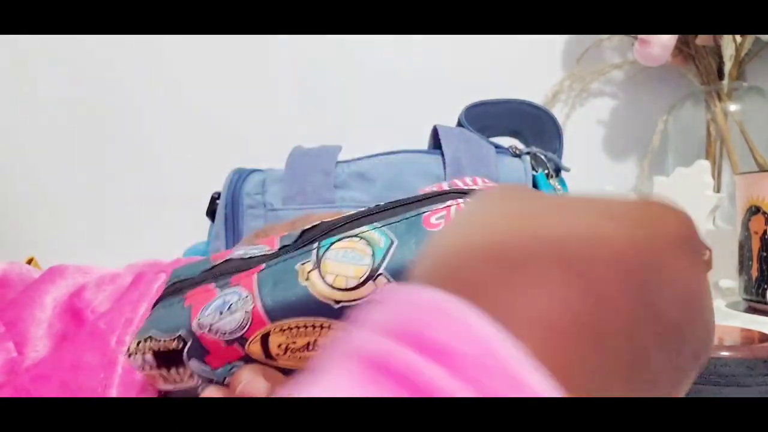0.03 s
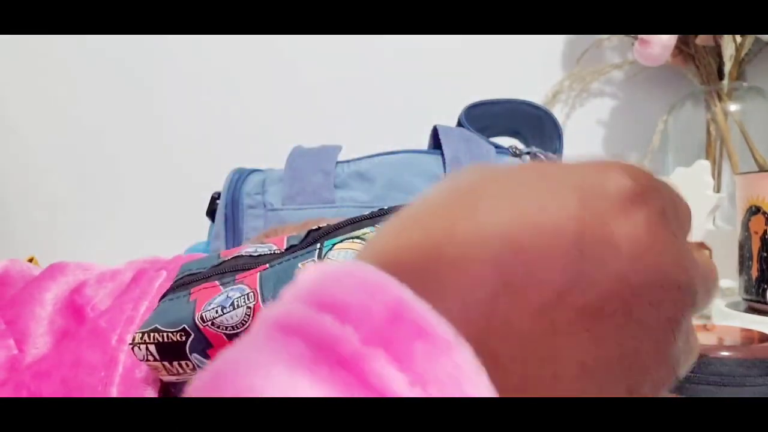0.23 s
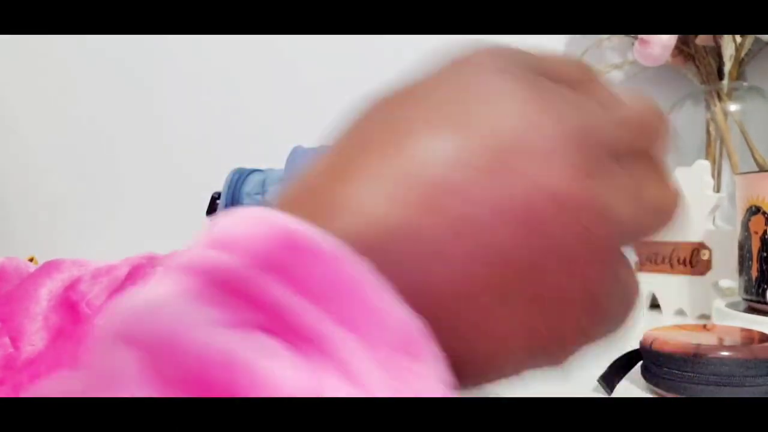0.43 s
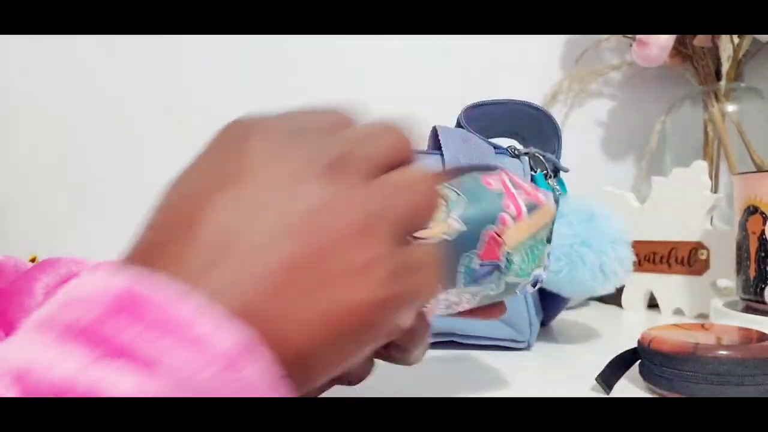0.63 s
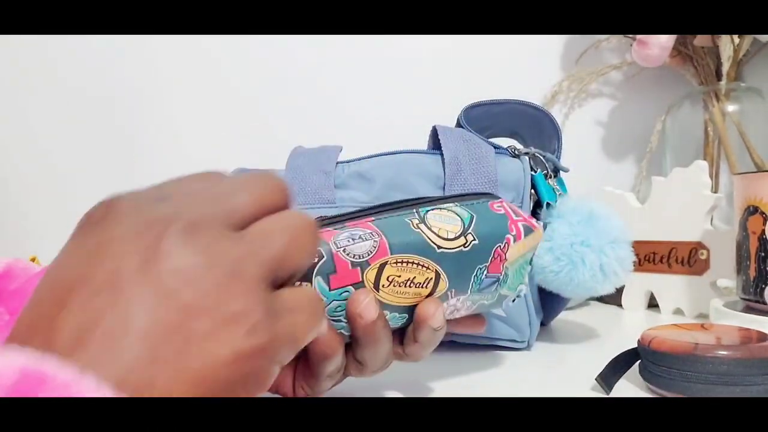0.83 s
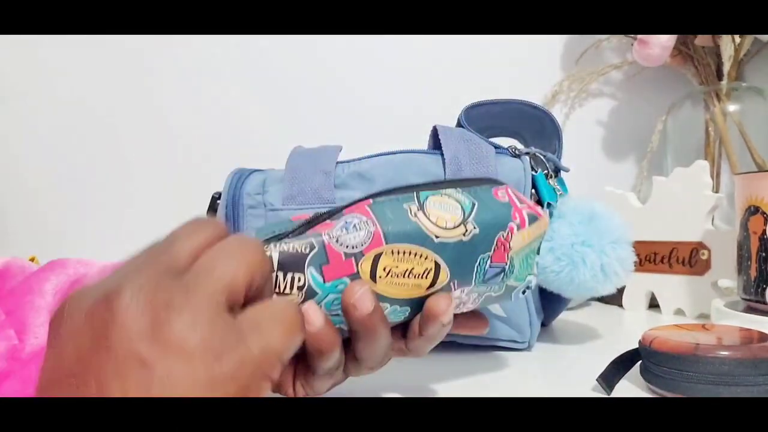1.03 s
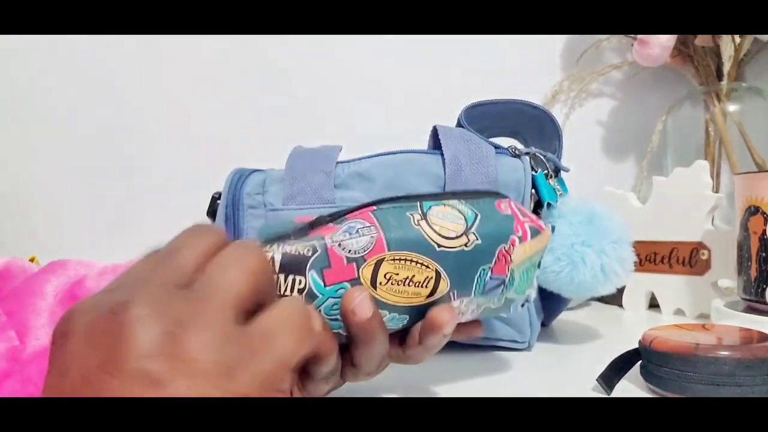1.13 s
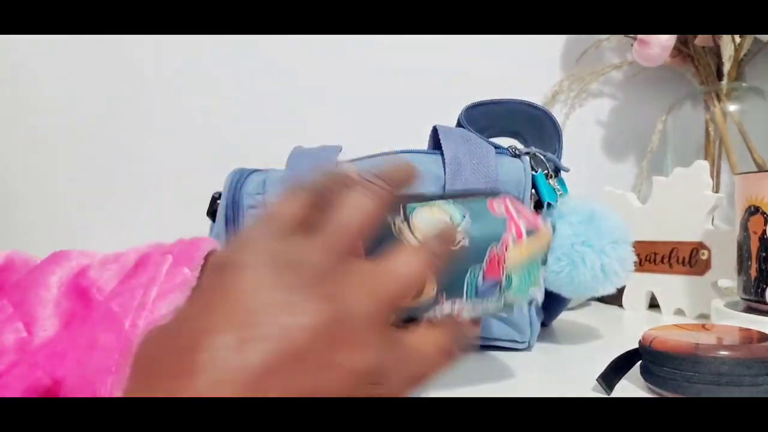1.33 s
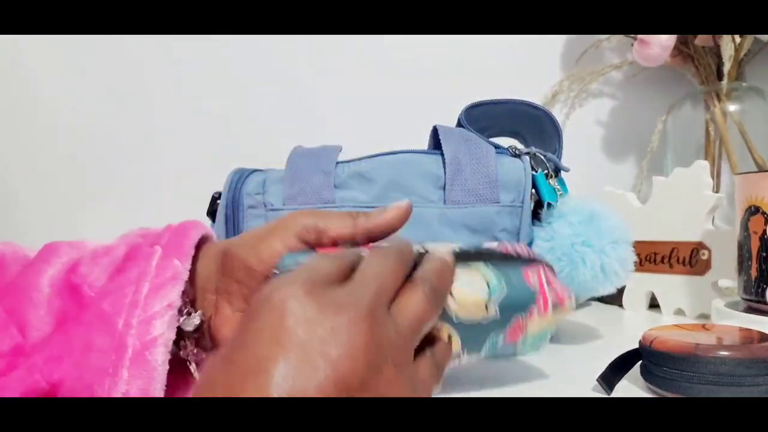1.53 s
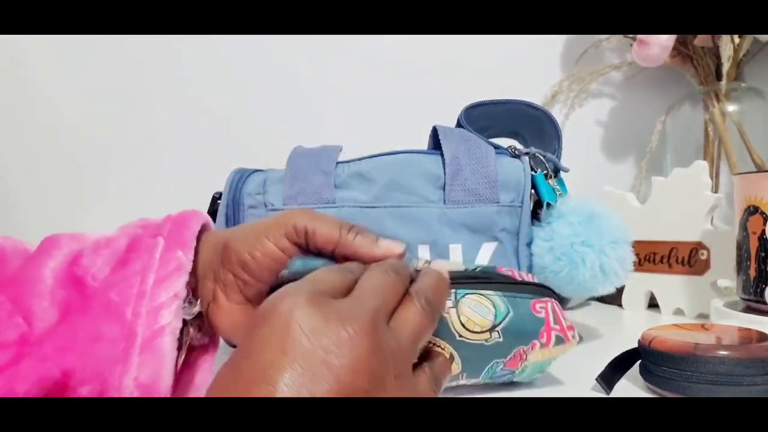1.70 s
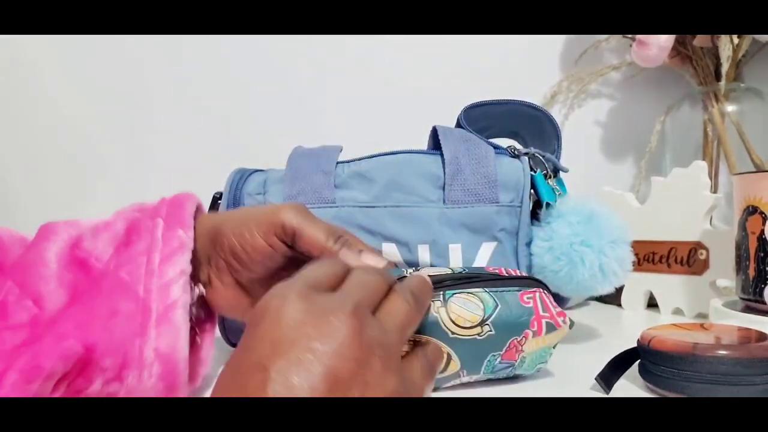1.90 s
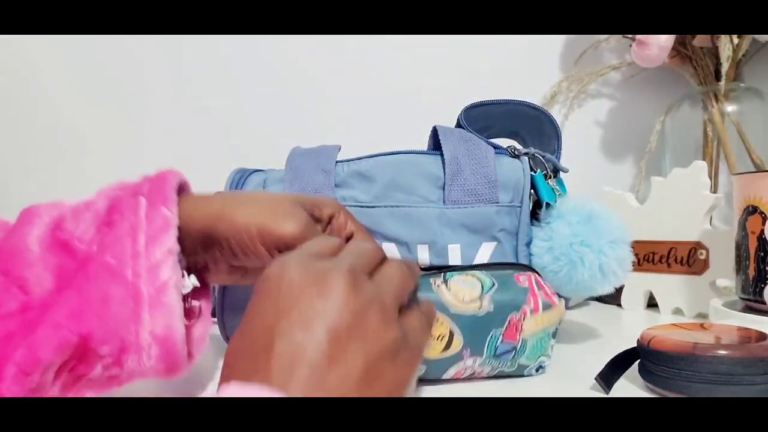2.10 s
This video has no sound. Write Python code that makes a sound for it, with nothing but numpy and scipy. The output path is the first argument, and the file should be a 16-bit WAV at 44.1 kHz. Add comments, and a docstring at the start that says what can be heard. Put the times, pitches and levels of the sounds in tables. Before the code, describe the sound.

A small pouch zipper opens close by: a short rasping tug, a brief lull, then a fast singing zip that slows into separate tooth clicks, followed by cloth rustle and crease snaps in a quiet room.

```python
"""A zipper on a small fabric pouch is pulled open nearby in a quiet room: tug, fast run, single teeth, slow end.
Each tooth knocks the slider, which scrapes and rings; the fast run also sings at the tooth rate.
Cloth rustles as hands turn and spread the pouch: noise with crackles, over a low rumble.
Creases and the pull tab snap (click, ring, noise); low decaying sines thump through the table.
Faint room tone lies beneath; a changing stereo side and a short room tail surround it all."""
import sys
import numpy as np
from scipy import signal
from scipy.io import wavfile
from scipy.ndimage import uniform_filter1d

SR = 44100
rng = np.random.default_rng(int(sys.argv[2]) if len(sys.argv) > 2 else 0)


def put_to_file(sound):
    """Save the sound as 16-bit audio at rate SR, in the file named by the first command-line argument."""
    columns = np.atleast_2d(sound).T  # one column per channel
    safe = np.clip(columns, -1, 1)
    whole_steps = np.round(safe * 32767)
    wavfile.write(sys.argv[1], SR, whole_steps.astype(np.int16))


N = 95123  # samples
TREBLE_HZ = 4500  # lower edge of the treble band

# fast run of the slider: t/s, mean tooth rate/(1/s), mean level of the tone/dB
FAST_RUN = [(.5, 258, -58), (.525, 249, -42.5), (.55, 342, -37), (.59, 524, -54), (.66, 590, -64),
            (.69, 523, -33), (.725, 536.2, -39), (.748, 555, -33.5), (.768, 560, -55), (.8, 378, -80)]


def gain_of(db):
    """Amplitude ratio of a level in dB."""
    return 10 ** (np.asarray(db) / 20)


def unit_rms(x):
    """Scales to an RMS of 1."""
    return x / np.sqrt(np.mean(x ** 2) + 1e-20)


def smooth(x, width):
    """Two moving averages along time, width in samples."""
    return uniform_filter1d(uniform_filter1d(x, width), width)


def curve(rows, column):
    """One table column, interpolated over the scene; column 0 is t/s."""
    rows = np.array(rows)
    return np.interp(np.arange(N) / SR, rows[:, 0], rows[:, column])


def colour(x, points):
    """Minimum-phase filter with the gains of a spectrum: f/Hz, level/dB."""
    f, db = np.transpose(points)
    hz = abs(np.fft.fftfreq(4096, 1 / SR))
    log_gain = np.interp(np.log(hz + 1), np.log(f + 1), db) * np.log(10) / 20
    taps = np.fft.ifft(np.exp(np.conj(signal.hilbert(log_gain)))).real[:2048]
    return signal.oaconvolve(x, taps)[:len(x)]


def band(x, hz, kind):
    """Third-order Butterworth filter."""
    return signal.sosfilt(signal.butter(3, hz, kind, fs=SR, output="sos"), x)


def steady(x):
    """Divides out the slow level, leaving the fine grain."""
    return x / np.sqrt(abs(smooth(x ** 2, 1300)) + 1e-4 * np.mean(x ** 2))


def patchy(x):
    """Random gain patches in time and pitch, as different folds rub and ring."""
    patch_db = 1.5  # RMS
    z = signal.stft(x, nperseg=256)[2]
    patches = uniform_filter1d(uniform_filter1d(rng.standard_normal(z.shape), 4, 0), 6, 1)
    return signal.istft(z * gain_of(patch_db * unit_rms(patches)), nperseg=256)[1][:N]


def resonate(x, hz, width_hz):
    """Steep resonance that follows the curve hz: two equal poles give a soft start."""
    turn = np.exp(2j * np.pi * np.cumsum(hz) / SR)
    r = np.exp(-np.pi * width_hz / SR)
    ring = turn * signal.lfilter([1], np.convolve([1, -r], [1, -r]), x / turn)
    return unit_rms(ring.imag)


def add(mix, s, sound):
    """Adds a sound at time s, cut at the end of the mix."""
    part = mix[round(s * SR):][:len(sound)]
    part += sound[:len(part)]


def tooth_knocks():
    """Impulse per tooth passed, and how slow the slider is (0 fast, 1 slow)."""
    # tooth rate in stretches, each starting on a tooth: t/s, rate/(1/s)
    stretches = [
        [(.299, 230), (.32, 338), (.345, 334), (.39, 286)],
        [(.423, 99), (.495, 100)],
        [(.8, 450), (.815, 235), (.836, 89)],
        [(.923, 105), (.965, 127), (1.05, 114)],
    ]
    # teeth passed one at a time: t/s, knock level/dB
    single_teeth = [(.839, -2), (.851, -2), (.8662, 2), (.8832, 4), (.901, 1), (.9132, 0)]
    jitter, size_db = 0.12, 2  # spreads: part of a tooth interval, knock level
    fast_per_s = 550  # tooth rate counted as fully fast
    knocks, slow, t = np.zeros(N), np.zeros(N), np.arange(N) / SR
    for rows in [*stretches, FAST_RUN]:
        on = (t >= rows[0][0]) & (t < rows[-1][0])
        rate = curve(rows, 1)
        teeth_passed = np.cumsum(rate * on) / SR
        at = np.flatnonzero(np.diff(np.floor(teeth_passed + 1 - 1e-3)))
        luck = rng.standard_normal((len(at), 2))
        at = at + np.round(jitter * luck[:, 0] * SR / rate[at]).astype(int)
        knocks[at] += gain_of(size_db * luck[:, 1])
        slow += on * np.clip(1 - rate / fast_per_s, 0, 1)
    for s, db in single_teeth:
        knocks[round(s * SR)] += gain_of(db)
    slow[(t > stretches[2][-1][0]) & (t < stretches[3][0][0])] = 1  # the single teeth
    return knocks, slow


def zipper():
    """Each tooth knocks the slider, scrapes briefly and rings; at speed the knocks fuse roughly."""
    # loudness: t/s, mid level/dB, bass re mid/dB, treble re mid/dB
    pull_levels = [(.29, -56, -12, -14), (.3, -42, -37, -19), (.312, -39, -23, -18),
                   (.322, -35, -13, -18.5), (.35, -40.5, -6.5, -15), (.392, -61.5, -2, -10),
                   (.48, -55.5, -17, -38), (.534, -39.5, -5.5, -18.5), (.586, -32, -13.5, -15),
                   (.624, -36.5, -1.5, -13), (.668, -33.5, -20.5, -8), (.752, -37, -19, -5),
                   (.77, -39, -8.5, -13), (.814, -52, -1.5, -8), (.885, -50, -8, -9),
                   (.95, -54.5, -1, -5.5), (.995, -52, -1, -8), (1.04, -64.5, 2.5, -3), (1.07, -81, -2, -4)]
    # scrape spectrum: f/Hz, relative density/dB
    scrape_spectrum = [(100, -13), (530, -8), (2630, -12.5), (9950, -12.5), (14200, -22), (15500, -101)]
    # slider and tape ring: mean f/Hz, width of each pole/Hz, relative level/dB
    ring_modes = [(780, 560, 0), (1950, 480, 0), (2900, 500, -6), (3800, 700, -11)]
    scrape_s, bass_hz = 0.0032, 450
    ring_db, slow_ring_db = -1, 13  # ring re scrape, and its rise when slow
    wander_part = 0.1  # RMS pitch drift as the tape bends

    knocks, slow = tooth_knocks()
    puffs = signal.lfilter([1], [1, -np.exp(-1 / (scrape_s * SR))], knocks)
    scrape = unit_rms(colour(puffs * rng.standard_normal(N), scrape_spectrum))
    ring = np.zeros(N)
    for hz, width_hz, db in ring_modes:
        wander = unit_rms(smooth(rng.standard_normal(N), 500))
        ring += gain_of(db) * resonate(knocks, hz * (1 + wander_part * wander), width_hz)
    x = scrape + gain_of(ring_db + slow_ring_db * slow) * unit_rms(ring)

    mid = steady(patchy(band(x, [bass_hz, TREBLE_HZ], "bandpass")))
    bass = steady(band(scrape, [170, bass_hz], "bandpass")) * gain_of(curve(pull_levels, 2))
    treble = steady(band(x, TREBLE_HZ, "high")) * gain_of(curve(pull_levels, 3))
    t = np.arange(N) / SR
    on = (t > pull_levels[0][0]) & (t < pull_levels[-1][0])
    return on * (mid + bass + treble) * gain_of(curve(pull_levels, 1))


def buzz():
    """The fast run sings at the tooth rate, wavering in pitch and level; overtones swell briefly."""
    # overtone swells: t/s, Gaussian half length/s, multiple of tooth rate, mean level/dB
    swells = [(.59, 0.0097, 5, -32.5), (.672, 0.015, 2, -34), (0.736, 0.016, 3, -30)]
    pitch_wobble, level_wobble_db = .022, 4  # RMS: part of the rate, level
    t = np.arange(N) / SR
    pitch_drift, level_drift = smooth(rng.standard_normal((2, N)), 200)
    turns = np.cumsum(curve(FAST_RUN, 1) * (1 + pitch_wobble * unit_rms(pitch_drift))) / SR
    fade = np.clip(np.minimum(t - FAST_RUN[0][0], FAST_RUN[-1][0] - t) / 0.0056, 0, 1)
    tones = gain_of(curve(FAST_RUN, 2)) * np.sin(2 * np.pi * turns)
    for s, half_s, multiple, db in swells:
        swell = gain_of(db) * np.exp(-((t - s) / half_s) ** 2)
        tones += swell * np.sin(2 * np.pi * round(multiple) * turns)
    return fade * gain_of(level_wobble_db * unit_rms(level_drift)) * tones


def cloth():
    """Rubbing hiss with small crackles."""
    # rustle: t/s, level below treble/dB, treble re that/dB
    rustle_levels = [(0, -62.5, 0.5), (.04, -72, 0), (.09, -62, -11.5), (.19, -69.5, -3), (.25, -54, -13.5),
                     (.29, -67, -1), (.41, -61.5, -7), (.5, -51, -22), (.88, -55, -6), (1.0, -50, -3.5),
                     (1.06, -66.5, -3.5), (1.15, -88, 4.5), (1.205, -66, 3), (1.22, -53.5, 7.5),
                     (1.26, -49.5, -2.5), (1.32, -53, -3), (1.37, -47, -5), (1.45, -64.5, 6.5),
                     (1.49, -50.5, 1.5), (1.585, -49.5, 4), (1.68, -54, -1.5), (1.72, -46.5, -6.5),
                     (1.76, -48.5, -6.5), (1.78, -47, 1.5), (1.86, -47.5, -4), (1.9, -53, -3),
                     (2.08, -50.5, -8.5), (2.125, -47.5, -2), (2.14, -38, -12)]
    # weave spectrum: f/Hz, relative density/dB
    weave_spectrum = [(88, -28.5), (150, -1.5), (490, -1), (1400, 0), (3480, -8.5), (5030, -22.5),
                      (10900, -25), (14300, -28), (15500, -63)]
    crackle_per_s, spread_db, crackle_db = 300, 3, -1  # level of crackle re hiss
    sizes = gain_of(spread_db * np.minimum(rng.exponential(1, N), 4))
    hits = (rng.random(N) < crackle_per_s / SR) * sizes
    crackle = signal.lfilter([1], [1, -.985], hits) * rng.standard_normal(N)
    rub = rng.standard_normal(N) + gain_of(crackle_db) * unit_rms(crackle)
    x = patchy(colour(rub, weave_spectrum))
    treble = unit_rms(band(x, TREBLE_HZ, "high")) * gain_of(curve(rustle_levels, 2))
    return (unit_rms(band(x, TREBLE_HZ, "low")) + treble) * gain_of(curve(rustle_levels, 1))


def snaps():
    """Creases and the pull tab: broad click, short ring, noise crunch with chattering tail, bright tick."""
    # t/s, ring level/dB, ring f/Hz, tick level before tick_db/dB, t60/s, crunch re ring/dB
    snap_events = [(0.0976, -47, 2230, -65, 0.0055, 8.5), (0.2132, -48, 2400, -53, 0.012, 7),
                   (0.2275, -18.5, 1870, -72, 0.0035, -16), (.278, -34, 1880, -48, 0.0086, 0.5),
                   (0.239, -51, 421, -76, 0.17, -6.5), (.304, -36, 3500, -40.5, 0.0078, -7),
                   (0.56, -27, 3740, -36.5, 0.0084, -11), (.992, -23, 746, -69, 0.0053, -27),
                   (0.998, -25.5, 1150, -62, 0.0052, -10), (1.0098, -38.5, 3860, -48, 0.0035, 1),
                   (1.3292, -27, 2730, -30.5, 0.012, -2.5), (1.4214, -26.5, 820, -49, 0.012, -14),
                   (1.4635, -35, 3880, -31.5, 0.03, -3), (1.4745, -25, 3350, -28, 0.0091, -0.5),
                   (1.486, -31, 2260, -29, 0.0084, -1), (1.517, -31, 3230, -42, 0.012, -1),
                   (1.596, -35.5, 1070, -44, 0.0093, 9), (1.644, -29, 1360, -51, 0.0097, -12),
                   (1.7005, -27.5, 3610, -52, 0.01, -12), (1.7073, -31.5, 3120, -57, 0.011, -2),
                   (1.709, -24.5, 1340, -60, 0.014, -16), (1.7165, -41.5, 1860, -67, 0.036, 3.5),
                   (1.743, -18.5, 956, -66, 0.012, -7.5), (1.746, -22, 1360, -66, 0.015, -23),
                   (1.7676, -23.5, 1420, -63, 0.012, -12), (1.7746, -32, 3400, -40.5, 0.019, -7.5),
                   (2.0497, -22.5, 1270, -76, 0.0079, -16), (2.11, -45, 495, -64, 0.038, 8.5),
                   (2.1336, -25, 3680, -57, 0.016, -2), (2.141, -16, 1550, -55, 0.005, -9)]
    click_db, click_s, tick_db = -7, 0.000094, 3
    rise_s, crunch_q = 0.00042, 1.05
    after_db, after_t60_s, chatter_db = -20.5, 0.1, 6  # chattering tail
    out, u = np.zeros(N), np.arange(5000) / SR
    rise = 1 - np.exp(-u / rise_s)
    v = u / click_s
    click = np.e * (1 - v) * np.exp(-v) * v
    for s, ring_db, hz, treble_db, t60_s, crunch_db in snap_events:
        crunch_noise, tick_noise, chatter_noise = rng.standard_normal((3, len(u)))
        fall = gain_of(-60 * u / max(t60_s, .002))
        chatter = chatter_db * unit_rms(uniform_filter1d(chatter_noise, 90))
        tail = fall + gain_of(after_db - 60 * u / after_t60_s + chatter)
        peak = signal.iirpeak(hz, crunch_q, SR)
        crunch = unit_rms(signal.lfilter(*peak, band(crunch_noise, [350, 5000], "bandpass")))
        body = fall * np.sin(2 * np.pi * hz * u) + tail * gain_of(crunch_db) * crunch
        tick = tail * gain_of(treble_db + tick_db) * unit_rms(band(tick_noise, TREBLE_HZ, "high"))
        add(out, s, gain_of(ring_db + crunch_db + click_db) * click)
        add(out, s, rise * (gain_of(ring_db) * body + tick))
    return out


def thumps():
    """The pouch bumps the table: a soft low push, a decaying sine."""
    # t/s, start level/dB, f/Hz, t60/s (at least 0.02 is used)
    bumps = [(1.271, -34, 90.5, 0.1), (1.55, -43.5, 56.5, 0.05), (1.793, -36.5, 75.4, 0.016),
             (1.857, -38, 65, 0.034), (2.096, -32, 65.4, 0.018)]
    out, u = np.zeros(N), np.arange(8000) / SR
    rise = np.minimum(u / 0.00073, 1)
    for s, start_db, hz, t60_s in bumps:
        fall = gain_of(start_db - 60 * u / max(t60_s, .02))
        add(out, s, -fall * np.sin(2 * np.pi * hz * u) * rise)
    return out


def handling_rumble():
    """The table hums with the handling: low noise with a moving level."""
    # t/s, level/dB
    rumble_levels = [(0, -51), (.04, -84), (.27, -72.5), (.5, -71.5), (.62, -62.5), (.69, -81),
                     (.76, -65.5), (1.14, -87), (1.22, -65), (1.28, -52.5), (1.48, -76.5), (1.78, -61),
                     (1.97, -70), (2.15, -54.5)]
    # table spectrum: f/Hz, relative density/dB
    table_spectrum = [(25, -26), (50, 5.5), (90, 7), (200, -6), (400, -25)]
    hum = band(colour(rng.standard_normal(N), table_spectrum), 330, "low")
    return unit_rms(hum) * gain_of(curve(rumble_levels, 1))


def room_tone():
    """Steady coloured noise."""
    # f/Hz, relative density/dB
    air_spectrum = [(18, -14), (30, 10), (6540, -22), (15500, -43)]
    air_db = -81
    return gain_of(air_db) * unit_rms(colour(rng.standard_normal(N), air_spectrum))


def scatter(x):
    """Sound scattered by the moving hands: overlapping pieces, each with its own random echoes."""
    shift_s, decay_s = .04, 0.004
    hop, u, out = round(shift_s * SR), np.arange(1000) / SR, np.zeros(N)
    padded = np.pad(x, (hop, 2 * hop))
    fade = np.sin(np.pi * np.arange(2 * hop) / (2 * hop))
    for k in range(N // hop + 1):
        taps = rng.choice([-1., 1.], len(u)) * np.exp(-u / decay_s)
        piece = signal.fftconvolve(padded[k * hop:(k + 2) * hop] * fade, taps / np.linalg.norm(taps))
        if k == 0:
            piece = piece[hop:]  # drop the padding ahead of the scene
        add(out, max(k - 1, 0) * hop / SR, piece)
    return out


def spread(x):
    """Stereo: mid plus or minus the scattered side, and a short room tail in each channel."""
    # f/Hz, side re mid/dB
    side_gain = [(60, -17.5), (180, -6), (550, -8), (1650, -2), (15000, 1)]
    # f/Hz, left re right/dB
    left_lean = [(60, 0.5), (500, -2.5), (3000, -2.5), (10000, -0.1)]
    room_db, room_t60_s = -10, 0.09
    u = np.arange(12000) / SR
    side = colour(scatter(x), side_gain)
    room_input = band(x, 283, "high")
    out = []
    for sign in (1, -1):
        tail = rng.choice([-1., 1.], len(u)) * gain_of(-60 * u / room_t60_s) * (u > .005)
        wet = gain_of(room_db) * signal.oaconvolve(room_input, tail / np.linalg.norm(tail))[:N]
        half_lean = [(hz, sign * db / 2) for hz, db in left_lean]
        out.append(colour(x + sign * side + wet, half_lean))
    return np.array(out)


def scene():
    """All layers summed, then spread to stereo."""
    return spread(zipper() + buzz() + cloth() + snaps() + thumps() + handling_rumble() + room_tone())


def record(dry):
    """Microphone roll-off and band limit."""
    edge_hz = 15600
    roll_off = signal.butter(10, 14500, fs=SR, output="sos")
    soft = signal.sosfilt(roll_off, band(dry, 40, "high"))
    return signal.oaconvolve(soft, signal.firwin(511, edge_hz, window=("kaiser", 9), fs=SR)[None], "same")


dry = scene()
out = record(dry)
put_to_file(out)
```